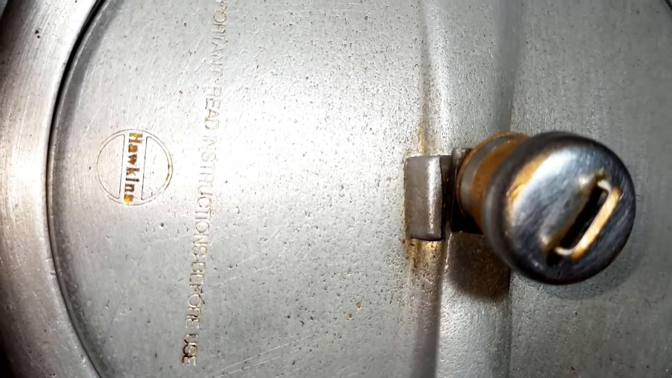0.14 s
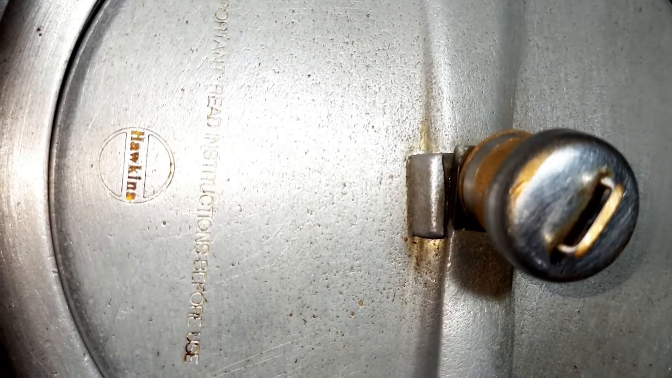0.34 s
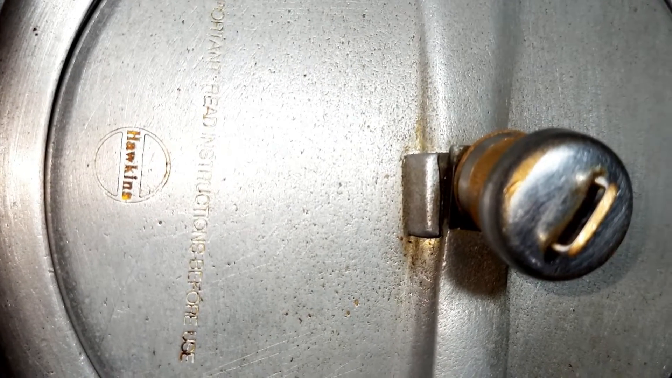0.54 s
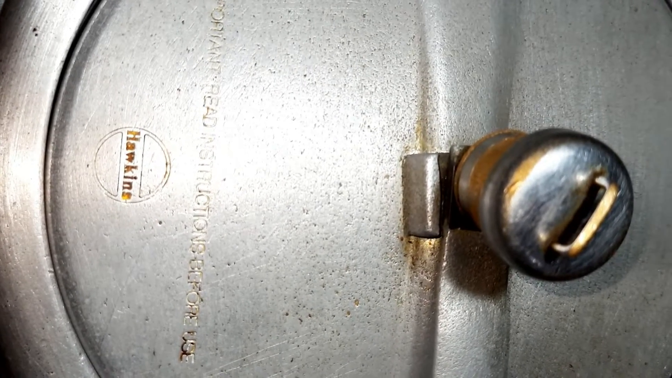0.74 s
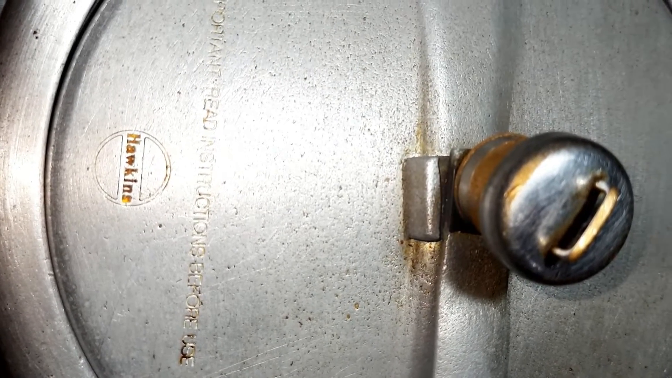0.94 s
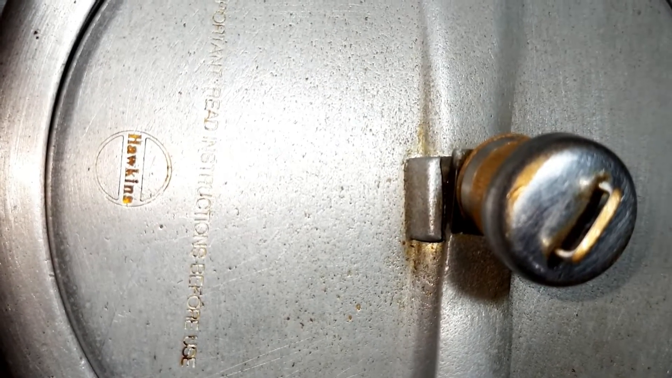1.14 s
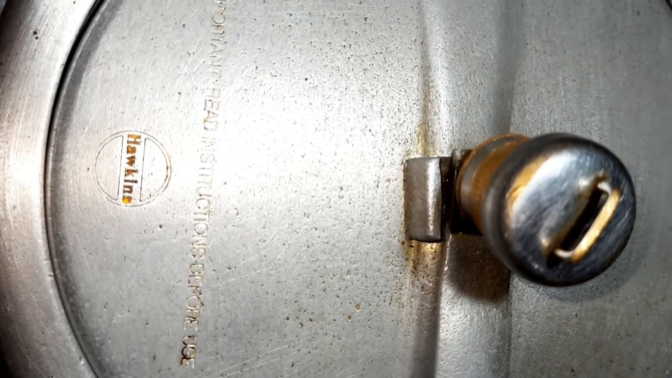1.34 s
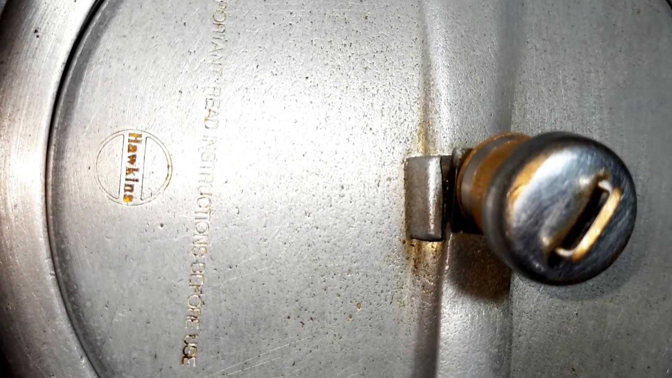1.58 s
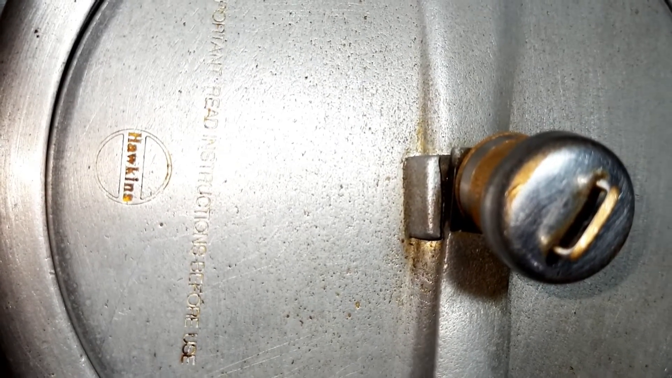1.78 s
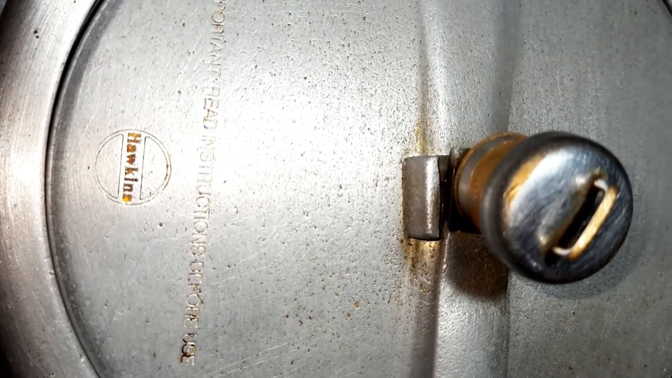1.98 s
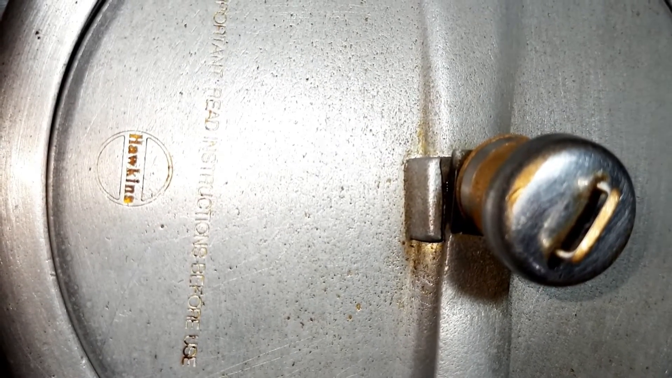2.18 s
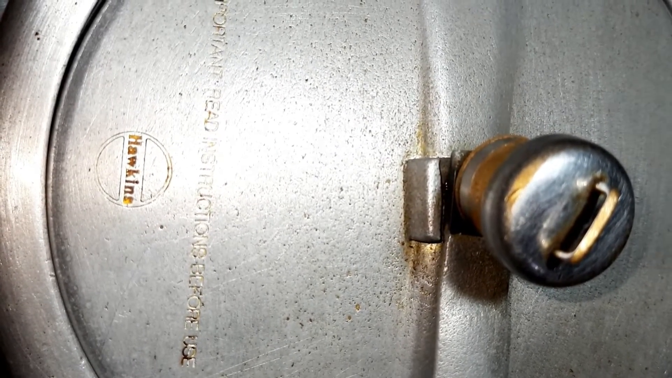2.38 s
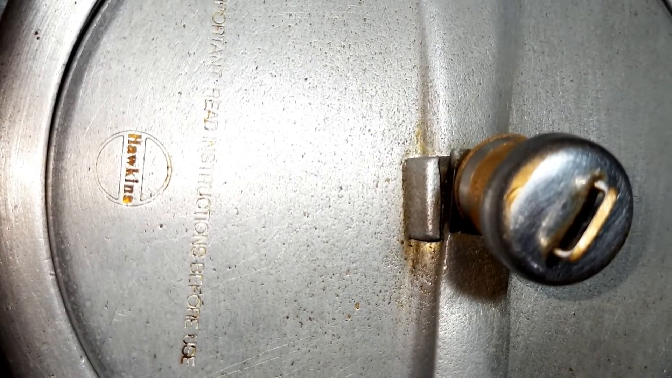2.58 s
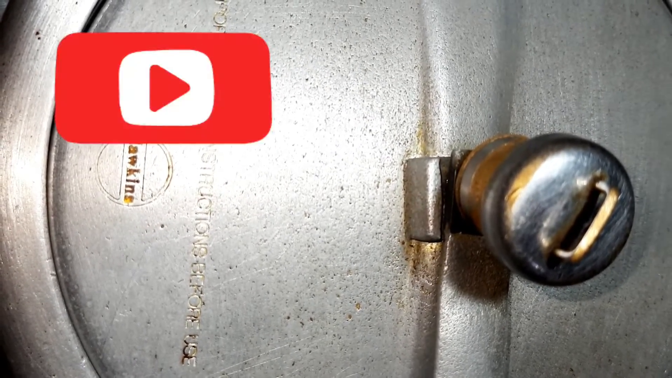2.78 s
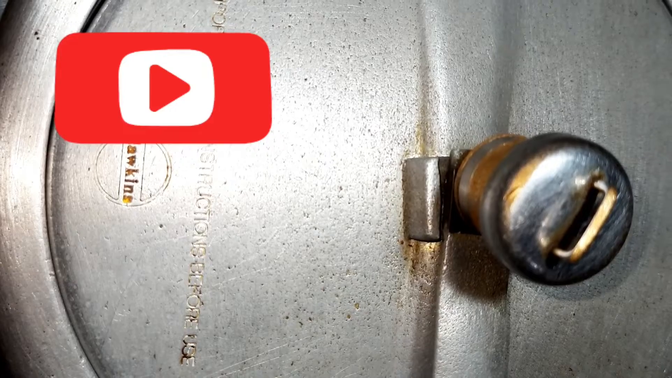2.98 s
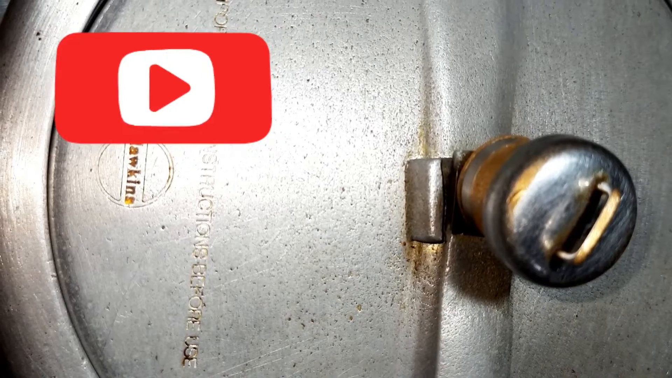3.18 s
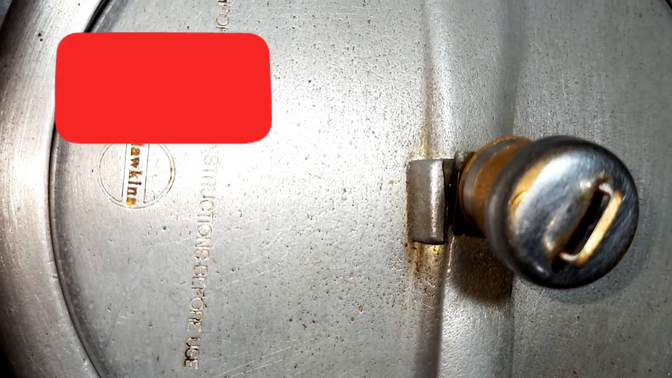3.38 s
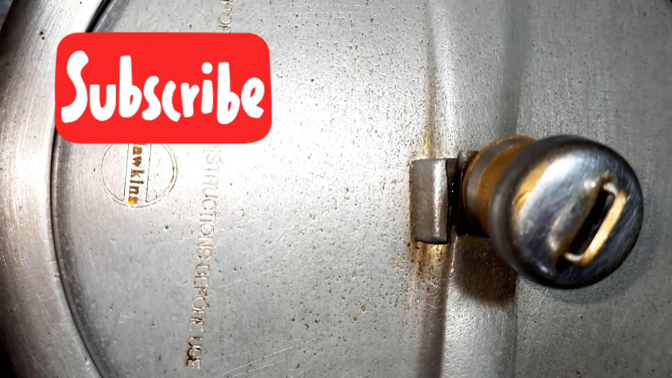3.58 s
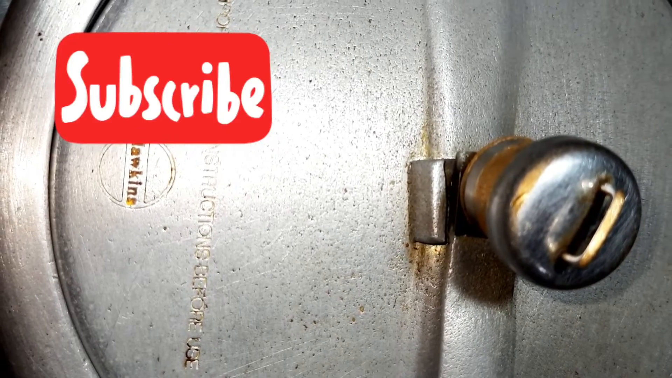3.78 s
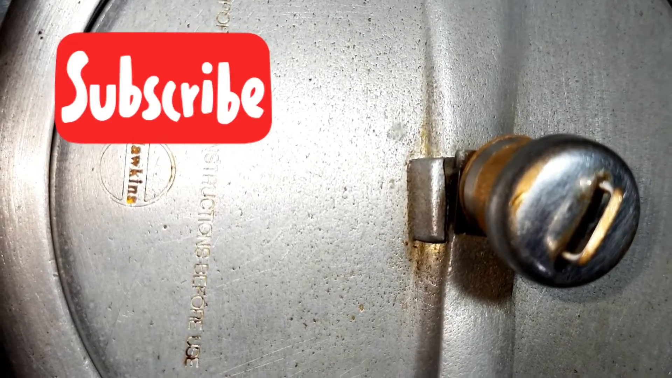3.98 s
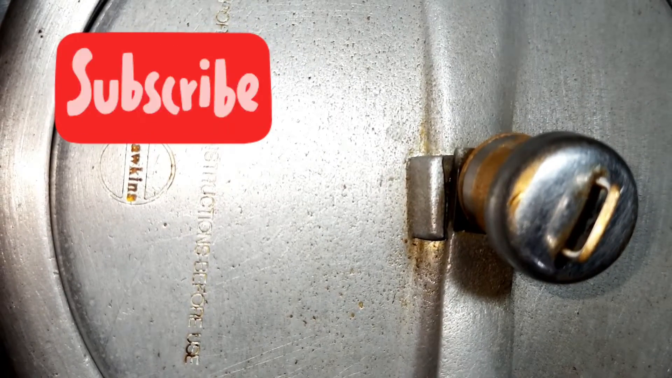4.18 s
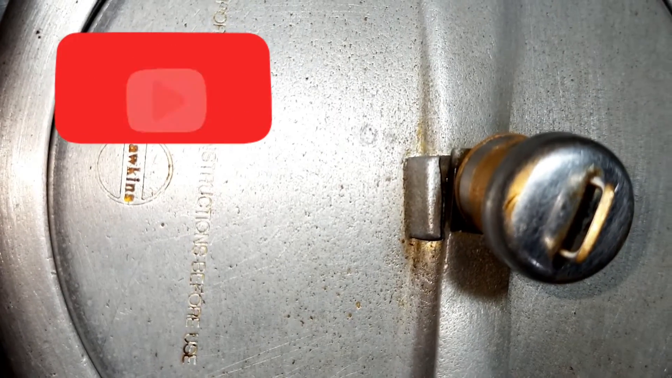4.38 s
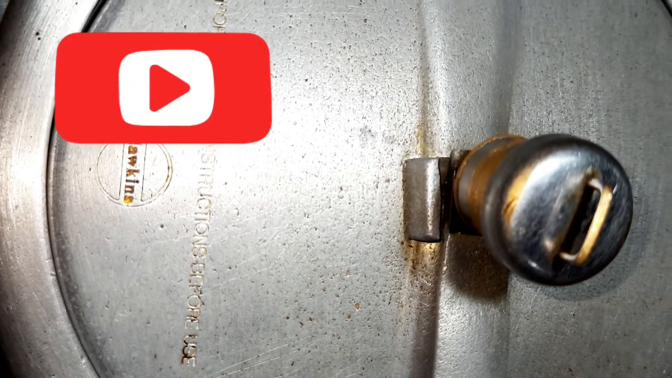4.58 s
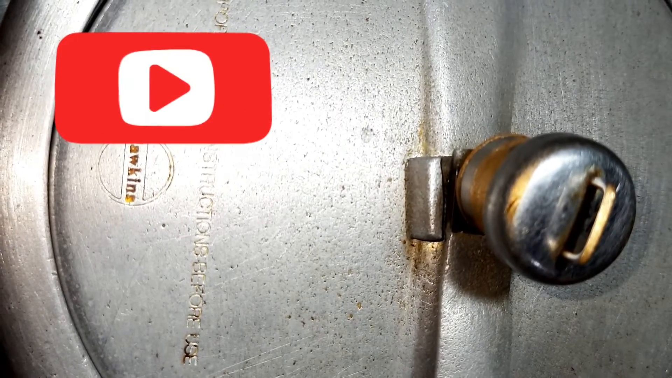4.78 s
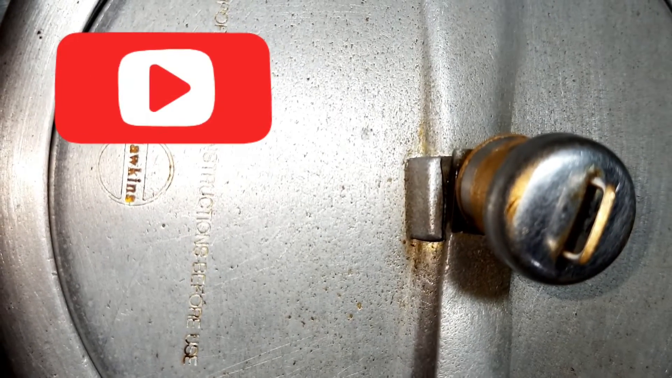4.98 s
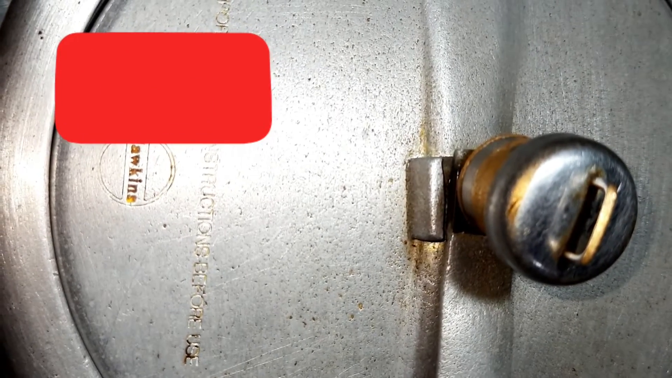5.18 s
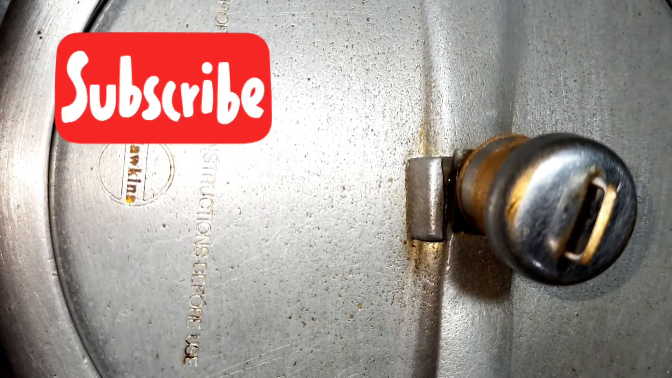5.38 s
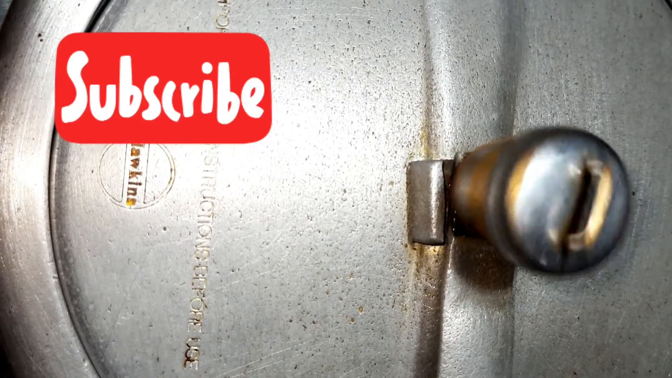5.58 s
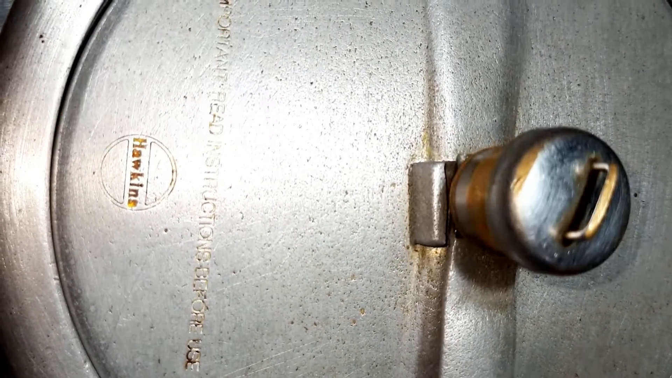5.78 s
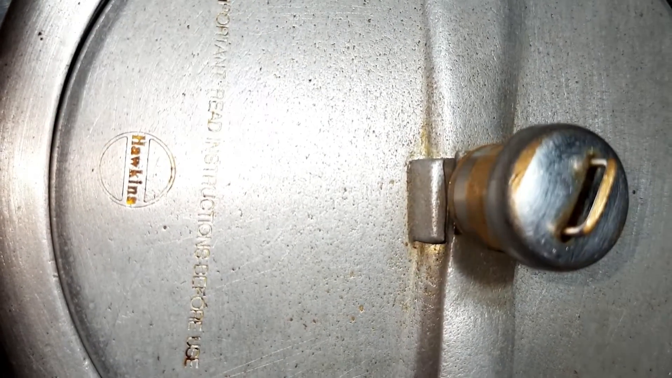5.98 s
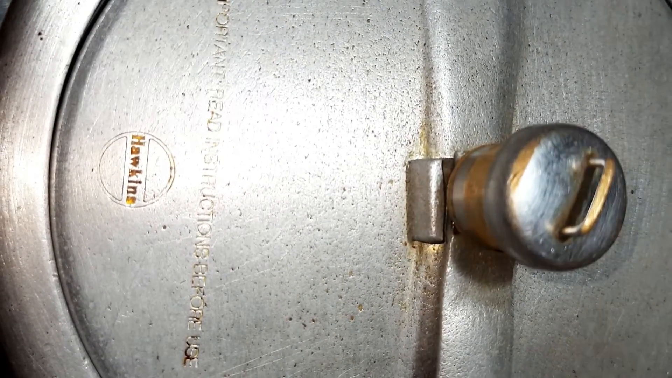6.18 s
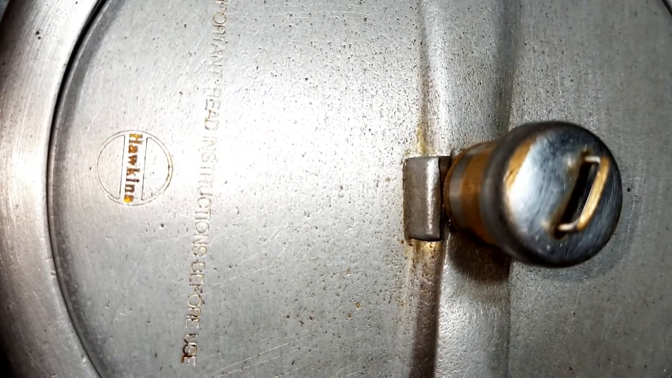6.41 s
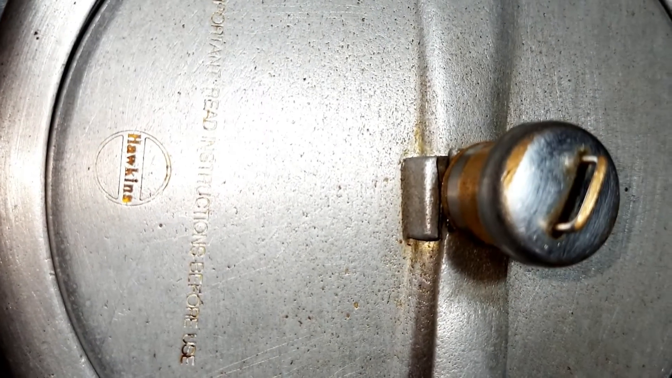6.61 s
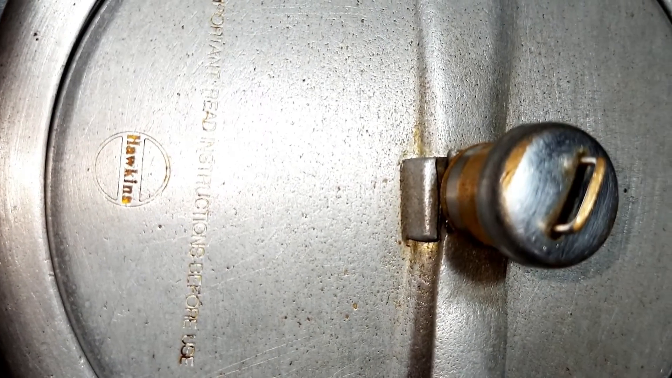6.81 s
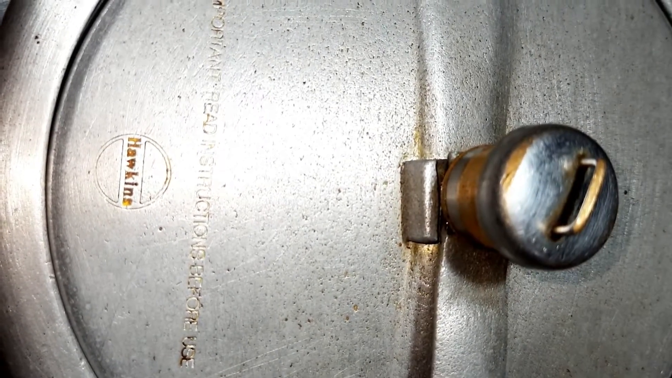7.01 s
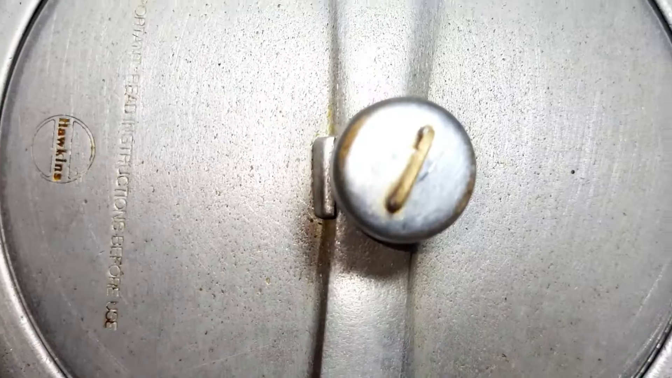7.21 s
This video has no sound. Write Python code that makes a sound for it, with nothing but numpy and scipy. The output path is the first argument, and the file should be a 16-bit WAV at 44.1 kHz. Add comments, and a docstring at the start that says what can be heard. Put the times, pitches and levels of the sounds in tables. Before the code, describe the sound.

Close to a pressure cooker lid in a hard-walled kitchen, a loud, bright jet of steam hisses and roars steadily, fluttering and spitting droplets. It stops abruptly with a brief airy hoot and a short room tail. Quiet low boiling rumble and thin leak hiss remain, with faint wavering tones, swelling until a wider hiss and low boom begin at the end.

```python
"""Steam blasts from a pressure cooker on a kitchen stove, heard by two microphone ports just above its lid.
Jet turbulence under the lifted vent weight rings the modes of cap and lid, flutters, and spits droplets.
Then the weight drops with a short hoot of low vent modes, and the jet is choked.
The pot rumbles as filtered noise and sings faintly in two wavering tones, while leak noise swells.
At the end the weight starts to lift again, with a wider hiss and a boom; hard walls return the steam noise."""
import sys
import numpy as np
from scipy import signal
from scipy.fft import rfft, irfft
from scipy.io import wavfile
from scipy.ndimage import uniform_filter1d

SR = 44100
rng = np.random.default_rng(int(sys.argv[2]) if len(sys.argv) > 2 else 0)


def unload_audio(sound):
    """Save the sound as a 16-bit wav file, at the path given as the first command line argument."""
    columns = np.transpose(np.atleast_2d(sound))
    # keep every value between -1 and 1, then stretch to whole-number steps
    steps = np.round(np.clip(columns, -1, 1) * 32767)
    wavfile.write(sys.argv[1], SR, steps.astype(np.int16))


N = 319725
T = np.arange(N) / SR  # time [s]
F = np.maximum(np.fft.rfftfreq(N, 1 / SR), 1)  # frequency [Hz]

# Tables. Spectra give relative level; their sources are scaled to a set level afterwards.
# kitchen reverberation by band: (top of band [Hz], decay time to -60 dB [s], level [dB])
KITCHEN_BANDS = [(676, 0.7, -8), (2780, 0.34, -7.5), (5000, 0.3, -6), (9000, 0.3, -9), (20000, 0.21, -9)]
# left port against right: (frequency [Hz], left minus right [dB])
PORT_SHADE = [(30, -10.5), (200, -1), (1400, -1), (1750, 2.5), (2300, -1.5), (4450, -1.25), (5700, -3.5),
              (6500, -2), (8800, 0.7), (9300, -10.5), (10400, -13), (10900, -18.5), (12700, -12),
              (15600, -6.5)]
# spectrum of flame and boiling water: (frequency [Hz], relative level [dB])
BOIL_SPECTRUM = [(18, -50), (30, -25), (45, -8), (70, 1), (110, -.5), (170, -5), (250, -12.5), (450, -22.5),
                 (700, -27), (850, -33), (1000, -45), (3000, -70)]
# air modes of the pot in the boom: (frequency [Hz], width [Hz], lift [dB])
POT_AIR_MODES = [(72, 24, 6.5), (168, 26, 7.5), (280, 41, 8), (370, 60, 5)]
# swells of the lower and the upper tone, a list for each:
# (time [s], Gaussian half-length [s], level before the port gains [dB])
TONE_SWELLS = ([(5.745, .04, -71.5), (5.935, 0.049, -71), (6.14, .04, -76), (6.245, .055, -68.5),
               (6.57, 0.046, -74), (6.79, .05, -68)], [(5.72, 0.052, -79), (5.92, .055, -82),
               (6.27, .06, -78.5), (6.655, .06, -73), (6.96, .045, -72)])
# soft low bumps in the pot: (time [s], frequency [Hz], Gaussian half-length [s], peak level [dB])
POT_BUMPS = [(6.047, 122, .0045, -41), (6.503, 95, .009, -49), (7.028, 65, .007, -37)]
# leak past the seated weight: (frequency [Hz], relative level [dB])
LEAK_SPECTRUM = [(500, -12), (1000, -20), (2500, -23), (4000, -24.5), (5300, -24), (5900, -14),
                 (7300, -17.5), (8600, -9), (9900, -11), (11200, -5), (13000, -.5), (15600, -6)]
# hiss of the barely lifted weight: (frequency [Hz], relative level [dB])
LIFT_SPECTRUM = [(200, -4), (600, -20), (950, -10.5), (2500, -14.5), (3500, -16), (4300, -18.5),
                 (5200, -8.5), (5750, -8.5), (6050, -12), (7500, -6), (8400, 0), (9700, -6), (11200, 2.5),
                 (12700, -0.5), (15600, -6)]
# likeness of leak and lift hiss at the ports, before the modes: (frequency [Hz], correlation [-])
LEAK_LIKENESS = [(4000, .05), (6900, .1), (7500, 0.99), (11000, .3), (13000, .6)]
# modes and notches of the narrow gap under the weight: (frequency [Hz], width [Hz], lift [dB])
GAP_MODES = [(1950, 350, 0.5), (2700, 300, 3), (4230, 170, 3), (4400, 300, -6), (4760, 300, 10),
             (5330, 220, -3), (5660, 310, 9), (6080, 170, -6.5), (6370, 250, 8.5), (6980, 200, 5.5),
             (7450, 400, 1.5), (8250, 300, 3), (8850, 300, 3.5), (9500, 250, 4), (11200, 400, 3.5),
             (12680, 550, 5), (13870, 330, 4), (15200, 400, 2.5)]
# vent modes blown in the hoot: (frequency [Hz], width [Hz], relative level [dB])
VENT_MODES = [(330, 220, -9), (650, 40, -6), (800, 250, 3), (930, 160, -10), (1180, 710, -6),
              (2170, 700, -10.5)]
# jet turbulence: (frequency [Hz], relative level per Hz [dB])
JET_SPECTRUM = [(25, -35.1), (50, -20.6), (85, -18.3), (180, -21.7), (300, -21.5), (600, -25), (800, -25.3),
                (1400, -25.8), (4000, -24.6), (6000, -15.3), (8500, -13.4), (9300, -13.7), (10400, -16.1),
                (11500, -9.1), (13500, -8.0), (15600, -8.2)]
# a wide source differs between the ports; before the modes: (frequency [Hz], correlation [-])
JET_CORRELATION = [(100, 0.042), (1000, 0.26), (6900, 0.032), (7200, 0.97), (8500, 1), (10600, 0.71),
                   (12200, 0.067), (12500, 1)]
# modes of cap, vent and lid: (frequency [Hz], width [Hz], lift [dB], relative port polarity [-])
CAP_MODES = [(1220.0, 220.0, 2.5, -0.6), (1800.0, 340.0, 3.8, -1.0), (2160.0, 400.0, 4.0, 0.5),
             (2420.0, 200.0, 3.2, -0.8), (2720.0, 130.0, 3.8, 1.1), (2950.0, 290.0, 4.3, -1.2),
             (3470.0, 240.0, 5.7, 0.9), (3790.0, 130.0, 4.2, -0.2), (4110, 110, 0, 1.0),
             (4380.0, 250.0, 5.2, -0.3), (4660.0, 300.0, 0.0, -1.1), (5020.0, 380.0, 3.4, 1.1),
             (5420.0, 300.0, -1.0, -1.1), (5750.0, 420.0, 4.4, 0.1), (6060.0, 130.0, 1.5, 0.6),
             (6270, 130, -1.5, -.8), (6460, 110, 2.5, .6), (6590.0, 190.0, 3.6, -0.9),
             (6780.0, 140.0, 3.3, -0.8), (7170, 110, 1.5, 0), (7540.0, 140.0, 4.5, 0.1),
             (7880, 220, 0, -.55), (8110.0, 170.0, 4.0, 0.0), (8480.0, 220.0, 2.7, 0.3),
             (9960.0, 200.0, 3.2, 0.1), (10840.0, 580.0, 10.0, -0.25), (11690.0, 480.0, 5.2, 0.5),
             (12050.0, 310.0, 5.7, 0.3), (12730.0, 560.0, 6.4, -0.0), (13870.0, 420.0, 4.3, 0.0),
             (14710.0, 130.0, 2.6, 0.1)]
# strong eddies puffing at the microphones: (time [s], gain of the low roar [dB])
EDDY_PUFFS = [(2.092, 8.6), (2.31, 5.8), (2.416, 3.4), (3.637, 4.4)]
PUFF_S = .007  # Gaussian half-length

# motion of the weight: drop, seating and lift; then the time taken to drop, work loose and lift
DROP_S, SEAT_S, LIFT_S = 5.437, 5.476, 7.013
FALL_S, LOOSEN_S, RISE_S = .008, 0.39, 0.015
# kitchen: rate and spread of the wandering echo phase; gain of all steam sounds with their echoes
STIR_PER_S, STIR_RAD, STEAM_GAIN_DB = 14, 2.5, 1.86
# pot: rumble level, its gain as the weight works loose, boom level
BOIL_DB, BOIL_LOOSE_DB, BOOM_DB = -60, 11, -43.5
# pot tones: pitch, and resting level before the port gains
SINGING_HZ, SINGING_DB = (662, 753.7), (-92, -89.5)
PORT_GAINS_DB = [-3, 2.5]  # the tones are louder on the right
# Steam levels below are those before the kitchen and the steam gain.
# leak: level, growth with the pressure, gain as the weight works loose; level of the lift hiss
LEAK_DB, PRESSURE_DB_PER_S, LOOSE_DB, LIFT_DB = -63, 4, 9.5, -42
# hoot: level, attack, time from the drop to the fade, and fading
HOOT_DB, HOOT_ATTACK_S, HOOT_HOLD_S, HOOT_FADE_DB_PER_S = -40, 0.011, 0.057, 230
# jet: level with the vent open, change as the weight drops, and choking by the seat
BLAST_DB, HANG_DB, CHOKE_DB_PER_S = -18, -14, 330
# swelling of each group of cap modes: approximate spread and rate
WAVER_DB, WAVER_PER_S = 1.47, 18
TOP_HZ = 15750  # upper edge of the passband


def undb(db):
    """Logarithmic level: convert decibels to an amplitude gain."""
    return 10 ** (np.asarray(db) / 20)


def colour(points):
    """Spectral interpolation: join a (frequency, value) table on a log-frequency axis."""
    hz, value = np.transpose(points)
    return np.interp(np.log(F), np.log(hz), value)


def shape(x, db):
    """Linear filtering: weight each frequency of a sound by a gain in dB."""
    return irfft(rfft(x) * undb(db), N)


def unit(x):
    """Normalisation: scale a stereo sound so that the mean of its ports has rms 1."""
    return x / np.std(x.mean(axis=0))


def resonance(hz, width):
    """Modal response: a bell with 1 at its centre, half its height across the given width."""
    return 1 / (1 + (2 * (F - hz) / width) ** 2)


def modal_lift_db(modes):
    """Superposition of modes: add their lifts in dB at each frequency."""
    return sum(db * resonance(hz, width) for hz, width, db in modes)


def port_polarity():
    """Modal phase: each cap mode reaches the ports more in step or more in opposition."""
    return sum(polarity * resonance(hz, width) for hz, width, _, polarity in CAP_MODES)


def ramp(start, length):
    """Linear onset: rise evenly from 0 to 1."""
    return np.clip((T - start) / length, 0, 1)


def swell(centre, length):
    """Gaussian envelope: rise and fall smoothly, 1 at the centre."""
    return np.exp(-.5 * ((T - centre) / length) ** 2)


def seated_s():
    """Elapsed time since the weight first came down on its seat, 0 before."""
    return np.maximum(T - SEAT_S, 0)


def looseness():
    """Pressure balance: steam eases the weight off its seat, 0 tight to 1 loose at the lift."""
    return ramp(LIFT_S - LOOSEN_S, LOOSEN_S)


def walk(rate):
    """Slow chance: random levels held 1 / rate s and smoothed twice; spread near 1."""
    hold = max(int(SR / rate), 1)
    held = np.repeat(rng.standard_normal(N // hold + 1), hold)
    smooth = uniform_filter1d(uniform_filter1d(held, hold), hold)
    return 1.4 * smooth[:N]


def flutter(rate):
    """Steady mean flow: quick chance without slow drift, as the pressure behind the jet is steady."""
    x = walk(rate)
    return x - uniform_filter1d(x, SR // 6)


def turbulence(likeness):
    """Partial coherence: mix common and opposed white noise to set the correlation of two ports."""
    c = np.clip(likeness, -.99, .99)
    mid, side = rfft(rng.standard_normal((2, N)))
    mid = mid * np.sqrt((1 + c) / 2)
    side = side * np.sqrt((1 - c) / 2)
    return irfft(np.array([mid + side, mid - side]), N)


def at_ports(x, db):
    """Acoustic shading: colour a sound from the vent, weight its left port, and normalise it."""
    return unit(shape(x, db + np.outer([1, 0], colour(PORT_SHADE))))


def kitchen(x):
    """Diffuse reflection: hard walls return a decaying tail, its phase stirred by the hot air."""
    echoes, low = 0, 0
    scatter = rng.standard_normal((2, N))  # a different tail at each port
    for top, t60, db in KITCHEN_BANDS:
        decay = undb(-60 * T / t60) * (T > .005)
        tail = rfft(scatter * decay) / np.sqrt(np.sum(decay ** 2))
        echoes = echoes + undb(db) * tail * ((F >= low) & (F < top))
        low = top
    response = irfft(echoes, N)[:, :SR]
    wet = signal.fftconvolve(x, response, axes=1)[:, :N]
    stir = STIR_RAD * np.array([walk(STIR_PER_S), walk(STIR_PER_S)])
    return x + np.real(signal.hilbert(wet) * np.exp(1j * stir))


def boil_rumble():
    """Broadband excitation: flame and boil make low noise that grows as steam escapes."""
    churn_db = 1.0 * walk(11)
    boil_db = BOIL_DB + BOIL_LOOSE_DB * looseness() ** 2
    return unit(shape(turbulence(0.97), colour(BOIL_SPECTRUM))) * undb(boil_db + churn_db)


def lift_boom():
    """Cavity resonance: low noise rings the air modes of the pot once the weight lifts."""
    boom_db = colour(BOIL_SPECTRUM) + modal_lift_db(POT_AIR_MODES)
    return unit(shape(turbulence(0.86), boom_db)) * undb(BOOM_DB) * ramp(LIFT_S, RISE_S)


def pot_tones():
    """Frequency and amplitude modulation: two faint sines wander in pitch and swell."""
    tones = 0
    for hz, rest_db, swells in zip(SINGING_HZ, SINGING_DB, TONE_SWELLS):
        phase = 2 * np.pi * np.cumsum(hz + 1.3 * walk(12)) / SR
        size = undb(rest_db) + sum(undb(db) * swell(s, length) for s, length, db in swells)
        tones = tones + np.sqrt(2) * np.sin(phase) * size * undb(.8 * walk(25))
    return np.outer(undb(PORT_GAINS_DB), tones)


def pot_bumps():
    """Transient oscillation: soft low bumps are cosines under short Gaussian envelopes."""
    bumps = 0
    for s, hz, length, db in POT_BUMPS:
        bumps = bumps + undb(db) * swell(s, length) * np.cos(2 * np.pi * hz * (T - s))
    return bumps


def pot():
    """Superposition: the pot's rumble, boom, bumps and tones add linearly."""
    return boil_rumble() + lift_boom() + pot_bumps() + pot_tones()


def leak():
    """Flow through a narrow gap: thin hiss grows with pressure; a wider hiss joins at the lift."""
    gap_db = modal_lift_db(GAP_MODES)
    likeness = colour(LEAK_LIKENESS) + 0.64 * port_polarity()
    thin = at_ports(turbulence(likeness), colour(LEAK_SPECTRUM) + gap_db)
    wide = at_ports(turbulence(likeness), colour(LIFT_SPECTRUM) + gap_db)
    sputter_db = .5 * walk(40) + .4 * walk(9)
    thin_db = LEAK_DB + PRESSURE_DB_PER_S * seated_s() + LOOSE_DB * looseness() ** 1.3
    lifted = wide * undb(LIFT_DB) * ramp(LIFT_S, RISE_S)
    return (thin * undb(thin_db) + lifted) * undb(sputter_db)


def hoot():
    """Flow-excited resonance: the narrowing gap briefly blows the low modes of the vent."""
    gain = sum(undb(db) * resonance(hz, width) for hz, width, db in VENT_MODES)
    fading_s = np.maximum(T - DROP_S - HOOT_HOLD_S, 0)
    envelope = ramp(DROP_S, HOOT_ATTACK_S) * undb(HOOT_DB - HOOT_FADE_DB_PER_S * fading_s)
    return at_ports(turbulence(0.42), 20 * np.log10(gain)) * envelope


def droplets(per_s, size_db, scatter_db, burst_s):
    """Impulsive excitation: condensate drops of uneven size burst suddenly and decay exponentially."""
    struck = rng.random(N) < per_s / SR
    scatter = np.minimum(rng.exponential(size=N), 3)
    hits = struck * undb(size_db + scatter_db * scatter)
    return signal.lfilter([1], [1, -np.exp(-1 / (burst_s * SR))], hits)


def waver(x):
    """Modal modulation: three interleaved groups of cap modes swell and fade independently, by slow chance."""
    out = x
    for group in range(3):
        modes = sum(resonance(hz, width) for hz, width, _, _ in CAP_MODES[group::3])
        share = np.minimum(modes, 1) ** 2 / (1 + (F / 6500) ** 8)  # little of the treble
        out = out + irfft(rfft(x) * share, N) * (undb(WAVER_DB * walk(WAVER_PER_S)) - 1)
    return out


def blast():
    """Jet noise: turbulence at the open vent rings the cap, flutters as the weight rocks, and spits."""
    jet_db = colour(JET_SPECTRUM) + modal_lift_db([mode[:3] for mode in CAP_MODES])
    likeness = colour(JET_CORRELATION) + port_polarity()
    spit = droplets(per_s=20, size_db=-16, scatter_db=3.1, burst_s=.0008)
    jet = at_ports(turbulence(likeness) * (1 + spit), jet_db)
    # the large eddies of the plume waver more than the hiss of the narrow gap
    below_hiss = shape(jet, -10 * np.log10(1 + (F / 8500) ** 8))
    buffet = shape(jet, -10 * np.log10(1 + (F / 700) ** 4))
    roar = waver(below_hiss - buffet)
    hiss = jet - below_hiss
    puffs_db = sum(db * swell(s, PUFF_S) for s, db in EDDY_PUFFS)
    buffet_db = 1.8 * flutter(55) + puffs_db
    roar_db = 1.13 * flutter(45)
    hiss_db = .25 * flutter(50)
    plume = buffet * undb(buffet_db) + roar * undb(roar_db) + hiss * undb(hiss_db)
    rocking_db = 0.45 * flutter(45)
    opening_db = HANG_DB * ramp(DROP_S, FALL_S) - CHOKE_DB_PER_S * seated_s()
    return plume * undb(BLAST_DB + opening_db + rocking_db)


def scene():
    """Direct and reverberant fields: steam sounds in the room over the close, dry pot."""
    steam = blast() + leak() + hoot()
    return kitchen(steam) * undb(STEAM_GAIN_DB) + pot()


def record(dry):
    """Band limitation: a steep elliptic low-pass removes the extreme treble."""
    lowpass = signal.ellip(12, .2, 80, TOP_HZ, fs=SR, output="sos")
    return signal.sosfilt(lowpass, dry)


dry = scene()
out = record(dry)
unload_audio(out)
```